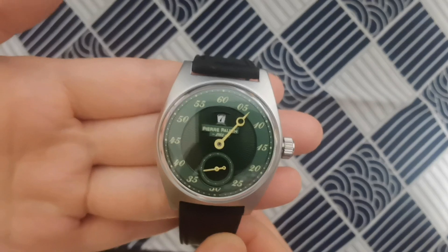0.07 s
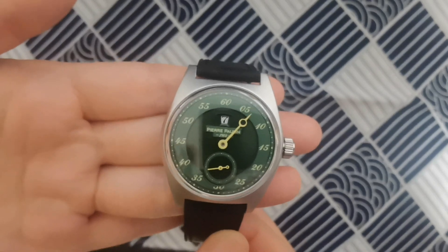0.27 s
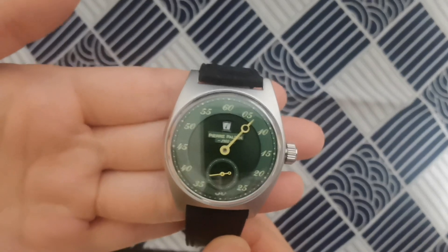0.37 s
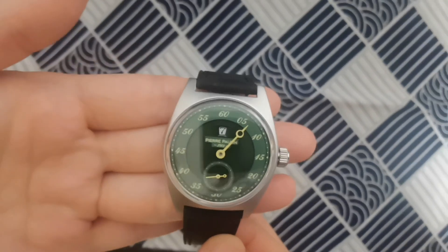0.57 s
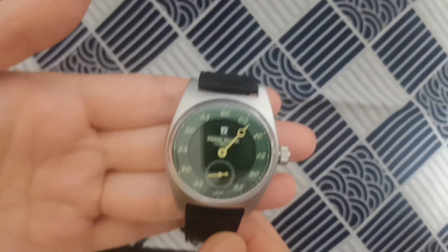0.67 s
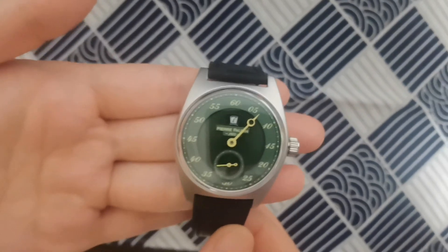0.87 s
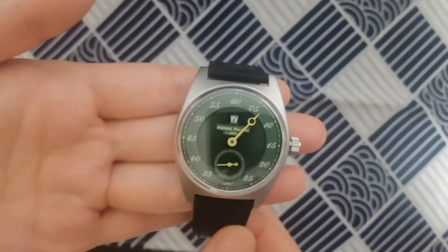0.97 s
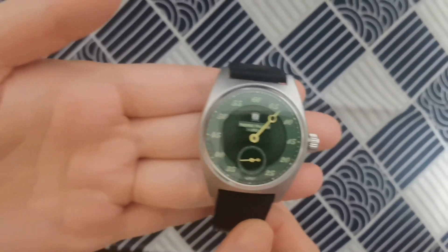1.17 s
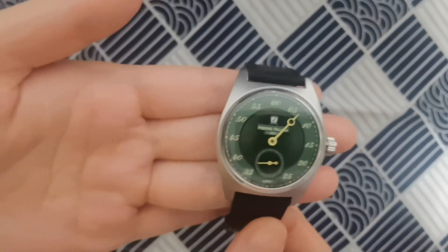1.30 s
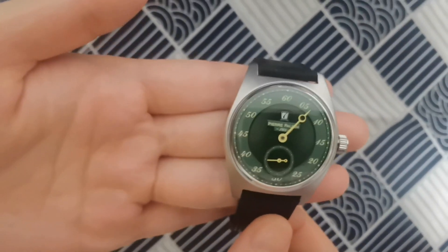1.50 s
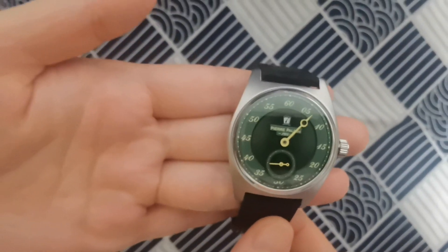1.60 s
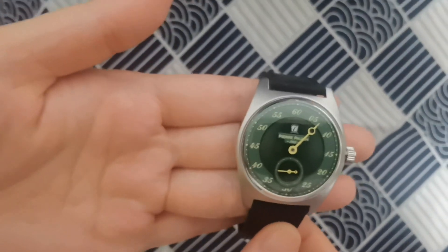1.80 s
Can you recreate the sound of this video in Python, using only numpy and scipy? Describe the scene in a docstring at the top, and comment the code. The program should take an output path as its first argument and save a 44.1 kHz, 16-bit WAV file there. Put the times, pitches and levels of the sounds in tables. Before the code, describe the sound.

A finger knocks and brushes on a microphone, with a brief sleeve rustle.

```python
"""A finger knocks and brushes on a camera's right microphone port (its small sound hole).
Each knock scuffs the port, snaps free and pushes in a puff of air, ending in a soft thud.
The scene starts silent, then the microphone opens with a soft pop. A sleeve rustles briefly,
and the hand shifting its grip makes a low rumble through the case, over a faint hiss."""
import sys
import numpy as np
from scipy import signal
from scipy.fft import rfft, irfft
from scipy.io import wavfile
from scipy.ndimage import uniform_filter1d

SR = 44100
rng = np.random.default_rng(int(sys.argv[2]) if len(sys.argv) > 2 else 0)


def output_pcm(signal):
    """Save a mono or channel-first signal as 16-bit PCM at the path in sys.argv[1].

    Samples are clipped to [-1, 1] before scaling.
    """
    pcm = np.clip(np.atleast_2d(signal).T, -1, 1) * 32767
    wavfile.write(sys.argv[1], SR, np.round(pcm).astype(np.int16))


N = 81585
T = np.arange(N) / SR

# Finger knocks: start_s, push_db, push_width_ms, thud_db, thud_pitch_hz,
# snap_db, snap_width_ms, snap_lead_ms, scuff_db, scuff_fade_ms
FINGER_KNOCKS = [(0.3225, -10, 0.35, -18.5, 133.6, -6.5, 0.044, 0.72, -28.5, 1.37),
                 (0.5611, -14.5, 0.17, -14, 168, -11.5, 0.021, 0.71, -24, 1.03),
                 (0.6427, -14.5, 0.2, -15.5, 144.6, -25, .04, 0.55, -26, 1.64),
                 (0.677, -16.5, 0.16, -13.5, 174, -15.5, .045, 0.52, -27.5, 1.9),
                 (.7100, -37, .25, -26.5, 270, -44, .05, .6, -40.5, 2.6),
                 (.7345, -12.5, 0.62, -17, 182, 0, 0.011, 0.574, -23.5, 1.8),
                 (0.8758, -33, 0.3, -39, 273, -31, 0.051, .5, -63, 3)]
# Tone of the skin snapping free: frequency_hz, gain_db
SNAP_TONE = [(100, -1), (400, -5), (650, 1.5), (1400, 4), (2300, -2), (3100, -6), (4300, -2), (6000, -9),
             (8000, -8), (9000, -28), (10500, -16), (16000, -33)]
# Tone of the skin scuffing the port: frequency_hz, gain_db
SCUFF_TONE = [(100, -2), (900, 9), (2000, 1), (4300, 0.5), (6000, -3.5), (8000, -4.5), (9000, -27),
              (10500, -16), (16000, -29)]
# Light brushes of skin: start_s, scuff_db, fade_ms, push_db, left_gain_db
SKIN_BRUSHES = [(.2470, -42.5, 1.2, -37.5, -8), (0.269, -39.5, 3.5, -38, -36), (0.3099, -39, 2.6, -29, -41),
                (0.345, -40, 3.8, -30.5, -29), (0.542, -32, 3.1, -29, -22), (.6260, -39.5, 2.7, -25.5, -30),
                (0.9072, -53, 4.2, -34, -34), (.9460, -52.5, 1.7, -63, -16), (1.011, -55.5, 2.3, -50, -24),
                (1.153, -61, 2.3, -52, -18), (1.25, -62, 2.6, -53, -14), (1.332, -61, 3.9, -43, -22),
                (1.373, -59, 1.2, -66, -21), (1.449, -65, 2.7, -58, -15)]
# Tone of a light brush: frequency_hz, gain_db
BRUSH_TONE = [(100, -2.5), (900, 2), (2000, -8.5), (4000, -2), (6000, -3.5), (7800, -5.5), (9000, -19),
              (11000, -17), (16000, -27)]
# Loudness of the sleeve over time: time_s, level_db
SLEEVE_LEVEL = [(.23, -58), (.33, -56), (.38, -47), (.43, -42.5), (.51, -43), (.59, -51), (.68, -55),
                (.77, -61), (.9, -58.5), (1.0, -66.5)]
# Tone of the sleeve: frequency_hz, left_db, right_db
SLEEVE_TONE = [(100, -20.5, -17.5), (400, -9.5, -9), (650, -7.5, -7.5), (1080, -7, -5.5), (1720, -11, -4.5),
               (2150, -12, -3), (2410, -11, 0), (2730, -13.5, 1), (3200, -14.5, -11), (4200, -18.5, -8),
               (5000, -23.5, -18), (5800, -28, -16), (7760, -28, -11), (8900, -24.5, -24),
               (10500, -22.5, -22), (16000, -30, -30)]
# Loudness of the grip's rumble over time: time_s, level_db
GRIP_LEVEL = [(.23, -42.5), (.33, -44), (.5, -48), (.62, -46), (.78, -48.5), (.92, -48), (1.06, -48.5),
              (1.22, -50.5), (1.3, -56.5), (1.39, -50.5), (1.52, -51), (1.6, -57.5), (1.74, -59.5),
              (1.85, -48)]
# Tone of the grip's rumble: frequency_hz, left_db, right_db
GRIP_TONE = [(10, -8, -13), (38.8, 2.5, -0.5), (80, -7.5, -8.5), (124.5, -13, -11.5), (227, -20, -17.5),
             (410, -32.5, -29.5), (810, -41.5, -34.5), (3000, -86, -94)]
# Dull rubs of the palm on the case: middle_s, half_length_s, left_db, right_db
PALM_RUBS = [(0.897, 0.033, -77, -46.5), (1.37, 0.055, -59, -62)]
# Tone of a palm rub: frequency_hz, gain_db
RUB_TONE = [(60, 3.5), (200, -1.5), (330, 2), (550, -14), (1200, -20.5), (4000, -25), (16000, -57)]
# Tone of the steady hiss: frequency_hz, left_db, right_db
HISS_TONE = [(100, 10.5, 2.5), (500, -1, -2.5), (1000, -3.5, -3), (1460, -5, -4), (2010, -6.5, -0.5),
             (2506, -11, 1), (4000, -8.5, -10.5), (5070, -18.5, -15), (7600, -24, -12.5),
             (9000, -19.5, -22), (11900, -18, -18), (16000, -18, -19)]


def finger_knocks():
    """Skin scuffs across the port, snaps free, pushes a puff of air into it and springs back."""
    pushes, snaps, scuffs = np.zeros((3, N))
    for (start, push_db, push_ms, thud_db, thud_hz,
         snap_db, snap_ms, lead_ms, scuff_db, scuff_ms) in FINGER_KNOCKS:
        contact = start - lead_ms / 1e3
        rebound = start + 2.24 * push_ms / 1e3  # as the push dies away
        pushes += air_push(start, push_db, push_ms) + fingertip_thud(rebound, thud_db, thud_hz)
        release = air_push(contact, 0, snap_ms)
        snaps -= 2 * gain(snap_db) * release / (release.sum() + 1e-20)
        scuffs += gain(scuff_db) * np.exp(-abs(T - contact) * 1e3 / scuff_ms)
    friction = shape_tone(scuffs * rng.standard_normal(N), SCUFF_TONE)
    sound = port(air_pocket(pushes) + shape_tone(snaps, SNAP_TONE) + friction)
    return np.array([gain(-36) * sound, sound])  # the left side hears very little


def air_push(peak_s, level_db, width_ms):
    """The finger makes a short, smooth bump of air pressure."""
    return gain(level_db) * np.exp(-0.5 * ((T - peak_s) * 1e3 / width_ms) ** 2)


def fingertip_thud(start_s, level_db, pitch_hz, fade_ms=4.07):
    """The soft fingertip springs back and swings once or twice."""
    age = np.maximum(T - start_s, 0)
    return -gain(level_db) * np.sin(2 * np.pi * pitch_hz * age) * np.exp(-age * 1e3 / fade_ms)


def air_pocket(push, pitch_hz=873):
    """The air between fingertip and port rings, giving the push a hollow tock."""
    ring = signal.lfilter(*signal.iirpeak(pitch_hz, Q=1.22, fs=SR), push)
    return push + gain(-2.5) * ring


def port(sound, cutoff_hz=58):
    """The port passes no deep bass, so each push swings back below zero."""
    return signal.lfilter(*signal.butter(1, cutoff_hz, "high", fs=SR), sound)


def skin_brushes(rise_s=0.0016):
    """Light touches make a few milliseconds of bright rubbing noise over a soft push."""
    out = np.zeros((2, N))
    friction = shape_tone(rng.standard_normal(N), BRUSH_TONE)
    for start, scuff_db, fade_ms, push_db, left_db in SKIN_BRUSHES:
        age = T - start
        rise_and_fall = np.exp(np.minimum(age / rise_s, -age * 1e3 / fade_ms))
        push = port(air_push(start, push_db, width_ms=0.28 * fade_ms))
        sound = gain(scuff_db) * rise_and_fall * friction + push
        out += [gain(left_db) * sound, sound]
    return out


def sleeve_rustle(grain_s=0.0033, grain_db=1.1, fade_db_per_s=130):
    """Cloth slides in one finely grained swell and trails off."""
    grain = normalize(uniform_filter1d(rng.standard_normal(N), round(grain_s * SR)))
    swell_db = np.interp(T, *np.transpose(SLEEVE_LEVEL))
    fade_db = fade_db_per_s * np.maximum(T - SLEEVE_LEVEL[-1][0], 0)
    return stereo_noise(SLEEVE_TONE) * gain(swell_db - fade_db + grain_db * grain)


def grip_rumble():
    """The shifting grip rumbles through the case, and the palm adds dull rubs."""
    level_db = np.interp(T, *np.transpose(GRIP_LEVEL))
    out = stereo_noise(GRIP_TONE) * gain(level_db)
    for middle, half_length, left_db, right_db in PALM_RUBS:
        swell = np.exp(-((T - middle) / half_length) ** 2)
        rub = shape_tone(rng.standard_normal(N), RUB_TONE) * swell
        out += gain([[left_db], [right_db]]) * rub
    return out


def hiss(level_db=-65.5):
    """Faint, steady noise lies behind everything."""
    return gain(level_db) * stereo_noise(HISS_TONE)


def gain(db):
    """Turns decibels into a number to multiply by."""
    return 10 ** (np.asarray(db) / 20)


def normalize(sound):
    """Scales a sound so that its average power is 1."""
    return sound / np.sqrt(np.mean(sound ** 2) + 1e-20)


def shape_tone(sound, tone, size=8192):
    """Filters a sound so that its lows and highs follow a tone table."""
    hz, db = np.transpose(tone)
    curve_db = np.interp(np.log(np.fft.rfftfreq(size, 1 / SR) + 1), np.log(hz), db)
    log_gain = np.log(gain(np.r_[curve_db, curve_db[-2:0:-1]]))
    # This filter rings only after a hit, never before it.
    spectrum = np.exp(np.conj(signal.hilbert(log_gain)))
    ring = np.fft.ifft(spectrum).real[:size // 2]
    return signal.fftconvolve(sound, ring / np.linalg.norm(ring))[:N]


def stereo_noise(tone):
    """Makes separate noise for left and right, each with its own tone."""
    hz, *sides = np.transpose(tone)
    log_hz = np.log(np.fft.rfftfreq(N, 1 / SR) + 1)
    curves = gain([np.interp(log_hz, np.log(hz), side) for side in sides])
    spectrum = rfft(rng.standard_normal((2, N)))
    return normalize(irfft(spectrum * curves, N))


def scene():
    """Adds the finger, the sleeve and the grip to the hiss."""
    return finger_knocks() + skin_brushes() + sleeve_rustle() + grip_rumble() + hiss()


def record(dry, open_s=0.2318, pop_db=-33, pop_fade_s=0.018, top_hz=16000):
    """The microphone opens with a soft pop and cuts off the highest treble."""
    pop = -gain(pop_db) * np.exp(-np.maximum(T - open_s, 0) / pop_fade_s)
    live = (dry + pop) * (T >= open_s)
    treble_cut = signal.firwin(255, top_hz, window=("kaiser", 9), fs=SR)
    return signal.oaconvolve(live, treble_cut[None], "same")


dry = scene()
out = record(dry)
output_pcm(out)
```